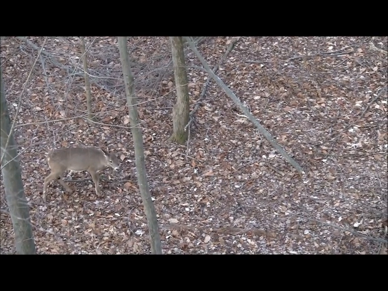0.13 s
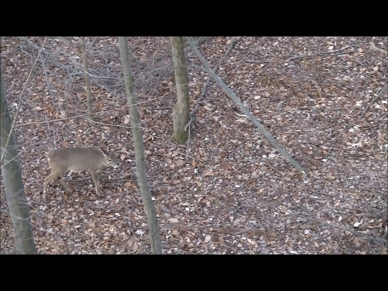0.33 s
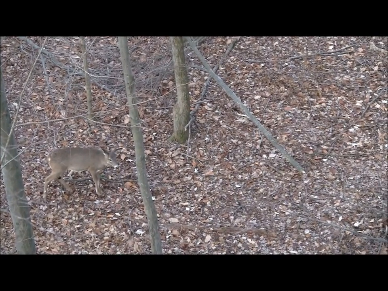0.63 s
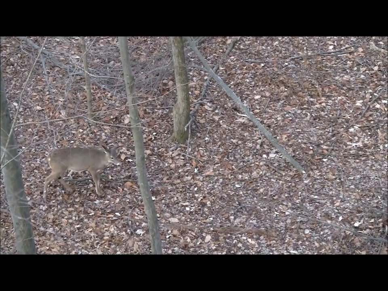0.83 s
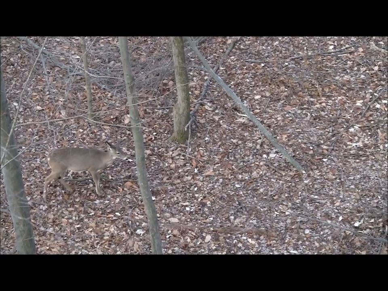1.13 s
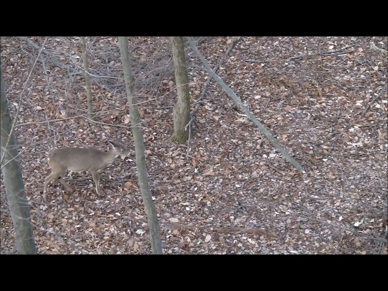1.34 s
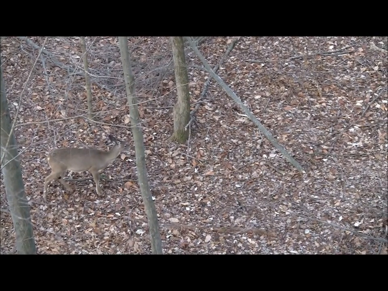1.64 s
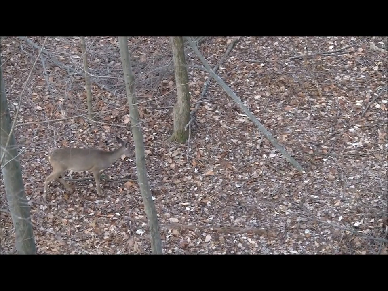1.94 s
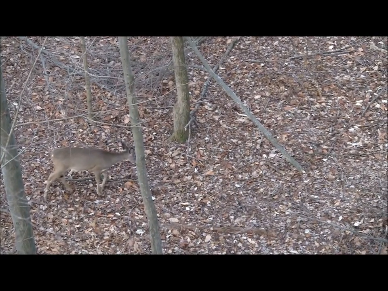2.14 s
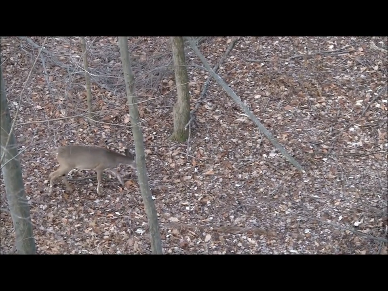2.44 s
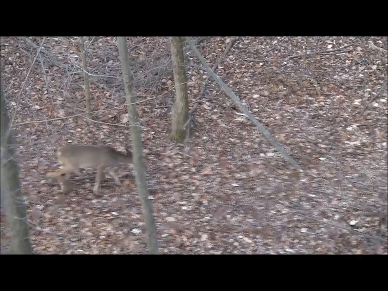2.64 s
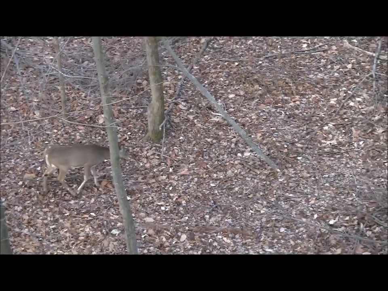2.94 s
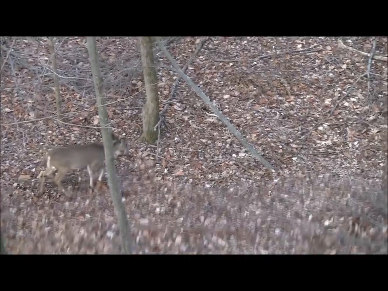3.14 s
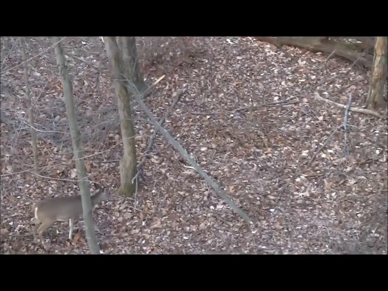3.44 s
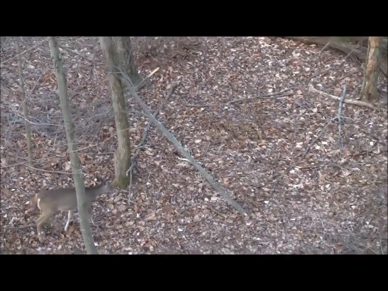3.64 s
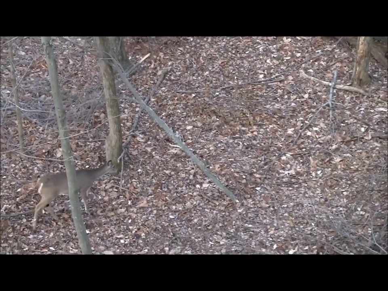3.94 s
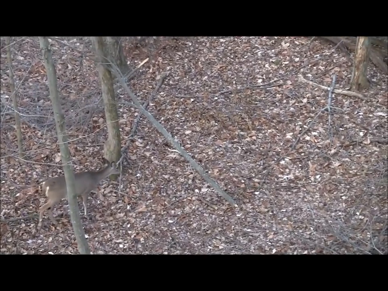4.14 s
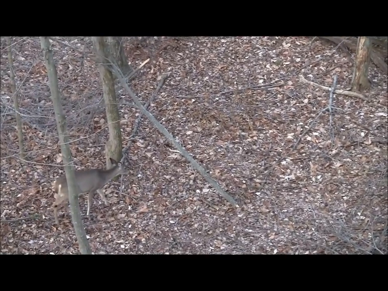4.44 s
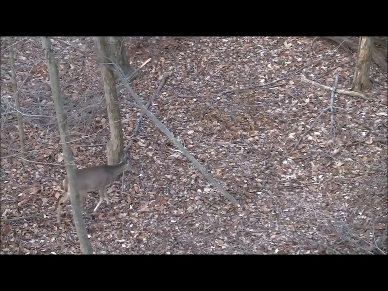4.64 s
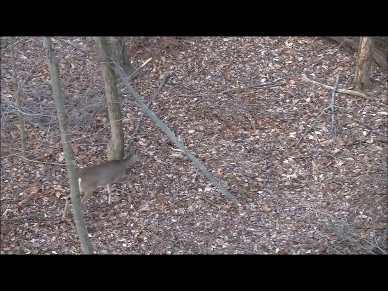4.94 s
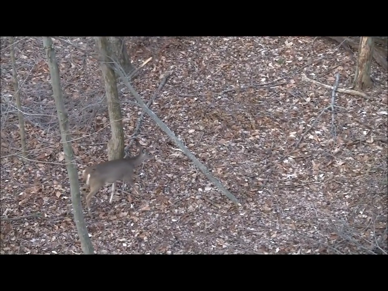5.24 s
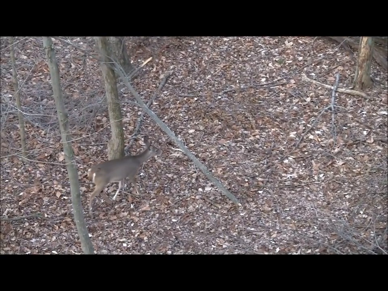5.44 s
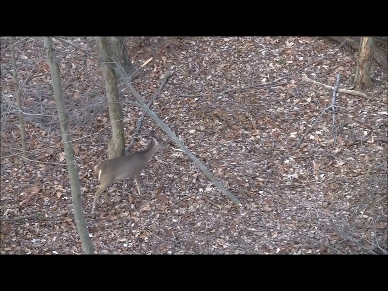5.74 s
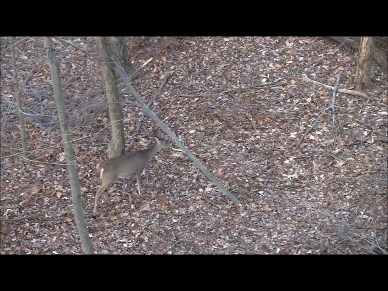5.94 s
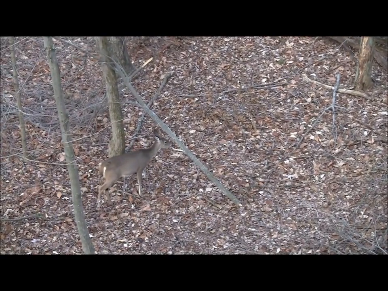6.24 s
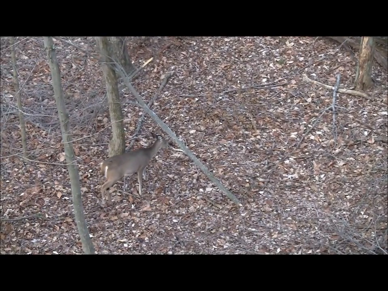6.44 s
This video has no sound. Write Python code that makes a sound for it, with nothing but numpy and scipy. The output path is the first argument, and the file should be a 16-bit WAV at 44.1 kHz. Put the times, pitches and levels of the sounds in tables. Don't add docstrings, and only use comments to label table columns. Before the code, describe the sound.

Distant road rumble and a low wavering engine drone in bare woods, with cloth rustle and sharp close crackles, mostly on the left.

```python
import sys
import numpy as np
from scipy import signal
from scipy.io import wavfile

SR = 44100
rng = np.random.default_rng(int(sys.argv[2]) if len(sys.argv) > 2 else 0)


def transcribe(u):
    v = np.clip(np.atleast_2d(u).T, -1, 1)
    q = np.round(v * 32767).astype(np.int16)
    wavfile.write(sys.argv[1], SR, q)


def voltage_ratio(level):
    return 10 ** (np.asarray(level, float) / 20)


N = 290178


def rms_one(x):
    return x / np.sqrt(np.mean(x ** 2) + 1e-20)


def in_time(rows):
    s, *columns = np.transpose(rows)
    return [np.interp(np.arange(N) / SR, s, c) for c in columns]


def at_hz(points, hz):
    f, level_db = np.array(points).T
    return np.interp(np.log(hz), np.log(f), level_db)


def swells(rows, edge_s):
    t = np.arange(N) / SR
    powers = []
    for start, hold, level_db, *_ in rows:
        outside = np.maximum(np.maximum(start - t, t - start - abs(hold)), 0)
        powers.append(voltage_ratio(2 * level_db) * np.exp(-(outside / edge_s) ** 2))
    return np.array(powers)


def over(power, rest_db):
    return 10 * np.log10(power.sum(axis=0) + voltage_ratio(2 * rest_db))


def drift(rate):
    r = np.exp(-80 * np.pi * rate / SR)
    slow = signal.lfilter([1], [1, -2 * r, r * r], rng.standard_normal(N // 40 + 2002))[2000:]
    return np.interp(np.arange(N) / 40, np.arange(len(slow)), rms_one(slow))


def ring(x, hz, t60):
    r = voltage_ratio(-60 / (t60 * SR))
    w = 2 * np.pi * hz / SR
    return signal.lfilter([0, np.sin(w)], [1, -2 * r * np.cos(w), r * r], x + 1e-18)


def banded(white, spectrum, likeness, patchy_db, tilt_db, pivot_hz, count):
    out, power = 0, 0
    edges = np.geomspace(spectrum[0][0], spectrum[-1][0], count)
    for k, (low, high) in enumerate(zip(edges, edges[1:])):
        band = signal.butter(2, [low, high], "band", fs=SR, output="sos")
        mid, side = signal.sosfilt(band, white[k % 2])
        hz = np.sqrt(low * high)
        level_db = at_hz(spectrum, hz)
        octaves = np.log2(max(hz / pivot_hz, 1))
        gain = voltage_ratio(level_db + tilt_db * octaves + patchy_db * drift(3.0))
        alike = np.clip(at_hz(likeness, hz), 0, 1)
        pair = np.sqrt(1 + alike) * mid + np.sqrt(1 - alike) * side * [[1], [-1]]
        out = out + gain * pair / np.sqrt(2)
        power += voltage_ratio(level_db) ** 2 * (high - low) * 2 / SR
    return out / np.sqrt(power)


def tone(cycles, level_db, flutter_db):
    level = np.sqrt(2) * voltage_ratio(level_db + flutter_db * drift(10.4))
    return level * np.sin(2 * np.pi * cycles + 0.32 * flutter_db * drift(3.5))


# f/Hz, width/Hz, level/dB
PORT_COLOUR = [(1350, 880, -5), (4660, 480, 2), (7600, 760, 2.5), (8700, 530, -2.5), (11100, 1600, 6)]


def housing(x):
    for hz, width_hz, gain_db in PORT_COLOUR:
        b, a = signal.iirpeak(hz, hz / width_hz, fs=SR)
        x = x + (voltage_ratio(gain_db) - 1) * signal.lfilter(b, a, x)
    return x


# t/s, level/dB, f/Hz, left-right/dB
CLOTH_TICKS = [(2.565, -42, 1800, 12), (2.782, -54, 3000, 6), (3.201, -52, 11000, 7),
               (3.584, -50.5, 4930, 2), (3.666, -50, 1100, 3), (3.681, -49.5, 2500, -1),
               (3.828, -40, 3330, 2), (3.829, -45, 1700, 7), (3.836, -45, 3300, -3), (4.1, -45, 5800, 2),
               (4.1128, -29.5, 1190, -5.5), (4.1127, -40, 3770, -7), (4.1143, -34.5, 2300, -4.5),
               (4.128, -37, 2100, -5), (4.132, -39, 3000, -5), (4.14, -41, 2600, -4),
               (4.1305, -39.5, 9000, -21), (4.7952, -29, 1800, 14), (4.821, -28.5, 2580, 6),
               (4.832, -35, 1500, 6), (5.083, -28, 7300, 8.5), (5.0848, -31, 7500, 18),
               (5.104, -35, 6960, 7), (5.128, -42, 7500, 5), (5.139, -42, 6500, 9), (5.146, -48, 6000, 6),
               (5.2002, -32, 2230, 11), (6.1337, -43.5, 4700, 16)]
# t/s, level/dB, length/ms, f/Hz, left-right/dB
CLOTH_SCUFFS = [(.11, -53, 30, 1300, 4), (.93, -49, 2.5, 6000, 9), (2.604, -51, 2.5, 5000, 9),
                (3.583, -41, 3.3, 900, 12), (3.795, -49.5, 2.5, 8000, 3), (4.104, -45, 10, 1490, -2),
                (4.117, -37, 10, 1000, -7), (4.125, -45, 5, 8600, -21), (4.127, -41, 29, 1320, -6),
                (4.134, -43, 11, 8700, -25), (4.4488, -38.5, 1.7, 6940, -0.5), (4.78, -47, 3, 7000, 8),
                (4.7898, -38.5, 4.4, 13100, 2.5), (4.795, -31, 2.1, 6500, 7), (4.799, -45, 29, 6000, 4),
                (4.815, -41, 3.4, 10000, 3), (4.8208, -33, 3.4, 7460, 15), (5.195, -35, 4, 4470, 14),
                (5.197, -40, 9, 12500, 13), (5.2, -31.5, 2.9, 6760, 8.5)]
# t/s, level/dB, length/ms, f/Hz, ringing over broad/dB
CLOTH_RIPS = [(5.4532, -23, 2.5, 4500, -1), (5.4553, -13, 1.3, 4750, -11), (5.458, -19, 2, 6500, 0),
              (5.4602, -14.5, 1.5, 4500, -3), (5.4632, -17, 2.8, 6300, -10), (5.4639, -25, 2, 1800, 8),
              (5.472, -36, 1.9, 6800, 8), (5.8012, -15, 0.61, 5160, -2), (5.802, -14.5, 0.93, 5900, 11),
              (5.8031, -26, 6.3, 7000, -15), (5.807, -40, 3.4, 11000, 6), (5.8104, -18, 0.36, 1310, -4),
              (6.2284, -21.5, 3.5, 7600, 1.5), (6.2305, -20, 3.6, 6050, 9), (6.2342, -15.5, 2.7, 4560, 1),
              (6.2353, -19, 1.8, 4730, 12), (6.2342, -19, 2, 12000, 3), (6.236, -10, 0.35, 3160, -6),
              (6.2373, -24.5, 5.7, 3500, -14), (6.241, -28, 3.5, 3000, -2.5)]


def crackles():
    size = 1536
    out = np.zeros((2, N + 2048))
    t, n = np.arange(size) / SR, np.arange(size)
    bursts = [(s, db, 2.65, hz, 13.5, pan) for s, db, hz, pan in CLOTH_TICKS]
    bursts += [(s, db, ms, hz, 0.5, pan) for s, db, ms, hz, pan in CLOTH_SCUFFS]
    bursts += [(*rip, 15) for rip in CLOTH_RIPS]
    shadow = signal.butter(1, 11000, fs=SR)
    for s, level_db, ms, hz, ring_db, pan_db in bursts:
        near, stray = rng.standard_normal((2, size)) * voltage_ratio(2.9 * rng.exponential(1, (2, size)))
        attack = np.clip(t / .00015, 0, 1)
        shape = attack * np.exp(-np.maximum(t - .0005 * ms, 0) / (.00045 * ms))
        broad = signal.butter(2, [min(1400, .5 * hz), min(13300, 2.94 * hz)], "band", fs=SR, output="sos")
        ring_gain = voltage_ratio(ring_db - 8.5) * np.sqrt(hz / 5000)
        sound = []
        for snaps in (near, near + 0.56 * stray):
            run = snaps * shape
            sound.append(signal.sosfilt(broad, run) + ring_gain * ring(run, hz, 10.2 / hz))
        sound = np.array(sound) / np.sqrt(np.sum(sound[0] ** 2) / (ms * SR / 1000))
        lag = .6 * min(abs(pan_db), 10)
        late = np.interp(n - lag, n, sound[1], left=0)
        far = voltage_ratio(0.5 - abs(pan_db)) * signal.lfilter(*shadow, late)
        pair = [sound[0], far] if pan_db > 0 else [far, sound[0]]
        at = round(s * SR)
        out[:, at:at + size] += voltage_ratio(level_db + 2.0) * np.array(pair)
    return housing(out[:, :N] + 1e-18)


# t/s, hold/s, level/dB, left-right/dB, brightness/(dB per octave)
CLOTH_STROKES = [(2.32, 0.021, -58.5, -5.5, 0.3), (2.537, 0.13, -60, 3, -.5), (2.75, .2, -66.5, 5, -4),
                 (3.11, .02, -67.5, 4, 2), (3.553, 0.73, -66.5, 4, -2.5), (4.17, .1, -66.5, 4, 0),
                 (4.347, 0.12, -57.5, 10.5, -0.7), (4.56, 0.062, -58, 9.5, -1), (4.72, 0.1, -61.5, 7, -2.5),
                 (4.9, 0.21, -58.5, 15, -2.5), (5.2, 0.14, -61.5, 10, -0.8), (5.45, 0.18, -65.5, 3, 1)]
# f/Hz, level/(dB per Hz)
CLOTH_SPECTRUM = [(600, -13), (1200, 1), (2200, -1.5), (4000, -5), (7000, -9.5), (11000, -13), (16000, -21)]


def rubbing():
    power = swells(CLOTH_STROKES, edge_s=0.052)
    level_db = over(power, rest_db=-75)
    pan_db, tilt_db = np.array(CLOTH_STROKES)[:, 3:].T @ power / voltage_ratio(2 * level_db)
    grain_db = 2.2 * rng.exponential(1, N) - 6.5 + 1.0 * drift(21.0)
    grains = rng.standard_normal((2, 2, N)) * voltage_ratio(grain_db)
    cloth = banded(grains, CLOTH_SPECTRUM, [(500, 0.13), (16000, 0.093)], patchy_db=1.5,
                   tilt_db=tilt_db, pivot_hz=2500, count=12)
    seam = rms_one(ring(ring(grains[0, 0], 4000, 0.0077), 4030, 0.0066))
    squeak = np.exp(-((np.arange(N) / SR - 5.0) / 0.15) ** 2) * seam
    cloth = cloth + voltage_ratio(-13) * squeak
    return voltage_ratio(level_db + 8.5 + pan_db * np.array([[.5], [-.5]])) * cloth


# t/s, peak level/dB, f/Hz, t60/s
HOUSING_JOLTS = [
    (3.582, -31, 450, .02),
    (3.5835, -33, 1300, .012),
    (3.5845, -38, 2200, .01),
    (4.113, -32, 750, .02),
    (4.122, -32, 800, .025),
    (4.138, -32, 700, .03),
    (5.456, -27, 360, .05),
    (5.803, -35, 650, .02),
    (6.233, -22, 385, .045),
    (6.236, -23, 530, .025),
]


def thumps():
    out = np.zeros(N)
    for s, level_db, hz, t60 in HOUSING_JOLTS:
        click = np.zeros(N)
        click[round(s * SR)] = voltage_ratio(level_db)
        out += ring(click, hz, t60)
    out = signal.sosfilt(signal.butter(4, 310, "high", fs=SR, output="sos"), out)
    return out * voltage_ratio([[3], [-3]])


# t/s, f/Hz
CYCLE_RATE = [(0, 46.6), (3.0, 46.8), (4.2, 46.3), (5.0, 45.6), (6.58, 44.8)]
# t/s, level/dB
ENGINE_LOAD = [(0.0, -40), (0.3, -44), (0.55, -42.5), (0.85, -48), (0.95, -44.5), (1.1, -45.5),
               (1.3, -40.5), (1.56, -45.5), (1.67, -40), (1.98, -45.5), (2.45, -39.5), (2.9, -39),
               (3.25, -45.5), (4.2, -49), (4.5, -61), (5.6, -65), (5.8, -46.5), (6.3, -43)]
# t/s, hold/s, level/dB
DRONE_SURGES = [
    (4.76, 0.076, -48),
    (5.1, 0.074, -46.5),
]
# t/s, hold/s, level/dB
SIXTH_SWELLS = [
    (.78, 0.086, -51.5),
    (2.5, 0.47, -50.5),
    (3.15, 0.56, -47),
    (3.9, 0.23, -50.5),
    (4.76, 0.046, -49.5),
]
# multiple of the cycle rate, level/dB
FAINT_ORDERS = [(2, -59.5), (3, -57.5), (5, -60)]


def engine():
    cycles = np.cumsum(in_time(CYCLE_RATE)[0] * (1 + 0.0024 * drift(6.1))) / SR
    edge_s = 0.078
    fourth_db = over(swells(DRONE_SURGES, edge_s), in_time(ENGINE_LOAD)[0])
    sixth_db = over(swells(SIXTH_SWELLS, edge_s), rest_db=-59.5)
    out = tone(4 * cycles, fourth_db + 0.074, flutter_db=-0.8)
    out = out + tone(6 * cycles, sixth_db - 0.5, flutter_db=-1.2)
    for k, level_db in FAINT_ORDERS:
        out = out + tone(round(k) * cycles + rng.random(), level_db, flutter_db=3)
    return out


# t/s, hold/s, level/dB
EARLY_WHINE = [
    (1.22, 0.11, -43.5),
    (1.6, 0.33, -46),
    (4.1, 0.57, -55.5),
]
# t/s, hold/s, level/dB
LATE_WHINE = [
    (5.5, 0.23, -48.5),
    (5.9, 0.3, -51.5),
]


def whines():
    t = np.arange(N) / SR
    early_hz, late_hz, edge_s = 620.5, 466.5, 0.051
    early_db = over(swells(EARLY_WHINE, edge_s), rest_db=-63)
    late_db = over(swells(LATE_WHINE, edge_s), rest_db=-66)
    early = tone(early_hz * t, early_db, flutter_db=-1.0)
    late = tone(late_hz * t, late_db + 1.5, flutter_db=.8)
    octave = tone(2 * late_hz * t, late_db - 13, flutter_db=1.5)
    return early + late + octave


# t/s, roar level/dB, brightness/(dB per octave above 400 Hz)
ROAD_COURSE = [(0.0, -43, 0.2), (1.5, -42, 0.4), (2.3, -43, 0.06), (5.13, -43, 0.1), (5.61, -41.5, -0.4),
               (6.32, -44.5, 2.5), (6.58, -42, -0.7)]
# f/Hz, level/(dB per Hz)
ROAR_SPECTRUM = [(22, -47), (45, -33), (87, -13), (150, -5.5), (230, -3), (350, -8), (500, -6.5),
                 (750, -8.5), (1000, -13.5), (1250, -24.5), (1500, -28.5), (2400, -72)]
# f/Hz, likeness/(0 to 1)
ROAR_LIKENESS = [(30, .15), (60, 0.8), (90, 1), (130, 0.93), (290, 0.88), (640, 0.76), (1000, 0.5),
                 (1410, 0.14), (2500, .03), (15000, .05)]


def road():
    roar_db, tilt_db = in_time(ROAD_COURSE)
    white = rng.standard_normal((2, 2, N))
    roar = banded(white, ROAR_SPECTRUM, ROAR_LIKENESS, patchy_db=1.17, tilt_db=tilt_db, pivot_hz=400, count=20)
    return voltage_ratio(roar_db + 2) * roar


# t/s, hold/s, level/dB
PORT_GUSTS = [
    (0.0, 0.36, -54.5),
    (.5, .75, -58),
    (2.38, .05, -60),
    (3.75, .03, -58),
    (4.15, .2, -47.5),
    (5.71, 0.04, -46),
    (6.1, 0.041, -50),
]


def wind():
    band = signal.butter(2, [55, 130], "band", fs=SR, output="sos")
    low = signal.sosfilt(band, rng.standard_normal((2, N)))
    return voltage_ratio(over(swells(PORT_GUSTS, edge_s=0.039), rest_db=-69)) * rms_one(low)


# f/Hz, level/(dB per Hz)
HISS_SPECTRUM = [(700, -3), (1700, -1), (3500, -1), (6000, -5.5), (8600, -9), (12000, -14), (14500, -18.5),
                 (15300, -27), (16000, -36)]


def microphone_hiss(order):
    hiss = banded(rng.standard_normal((2, 2, N)), HISS_SPECTRUM, [(500, 0.034), (16000, 0.087)],
                  patchy_db=-0.66, tilt_db=0, pivot_hz=1000, count=9)
    hiss = signal.sosfilt(signal.cheby2(order, 30, 15900, fs=SR, output="sos"), hiss)
    return voltage_ratio(-61 + np.array([[3.5], [2.5]])) * hiss


def scene():
    far = road() + (engine() + whines()) * voltage_ratio([[.3], [-.3]])
    far = np.array([far[0], np.roll(far[1], 4)])
    return crackles() + rubbing() + thumps() + far + wind()


def top_cut(x):
    return signal.sosfilt(signal.butter(12, 16520, fs=SR, output="sos"), x)


def record(dry, order=10):
    heard = dry + microphone_hiss(order)
    rounded = 0.88 * np.tanh(heard / 0.91)
    cut = signal.cheby2(order, 60, 16500, fs=SR, output="sos")
    return top_cut(signal.sosfilt(cut, rounded))


dry = scene()
out = record(dry)
transcribe(out)
```